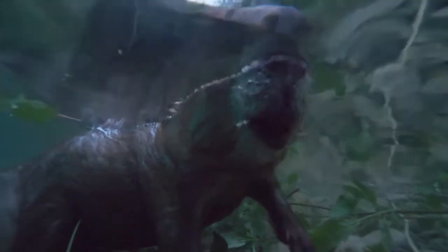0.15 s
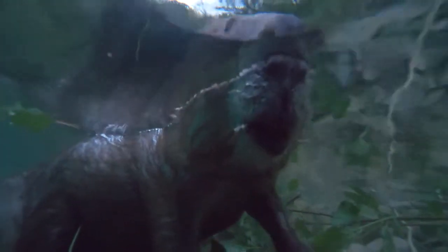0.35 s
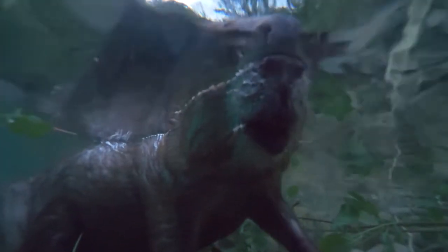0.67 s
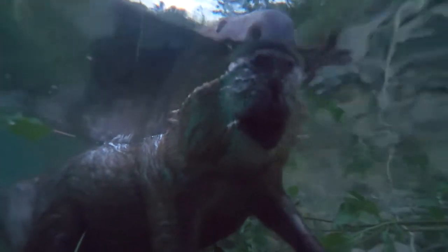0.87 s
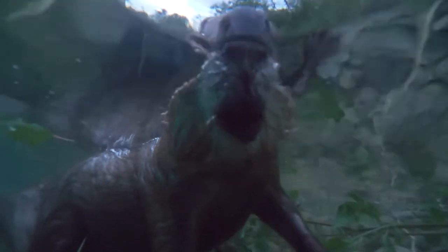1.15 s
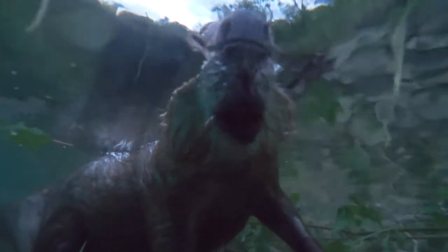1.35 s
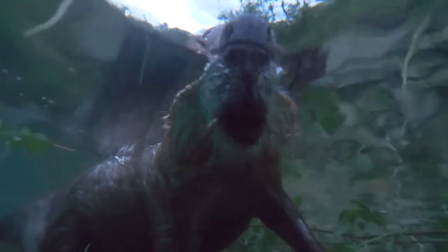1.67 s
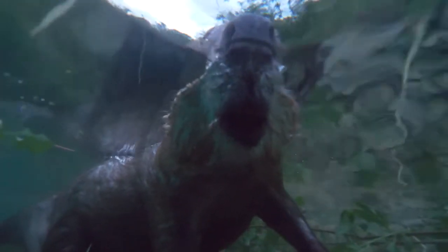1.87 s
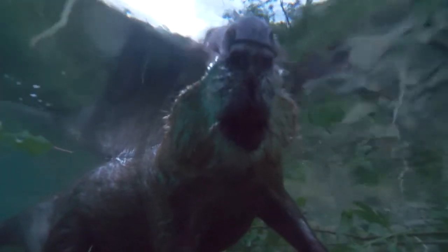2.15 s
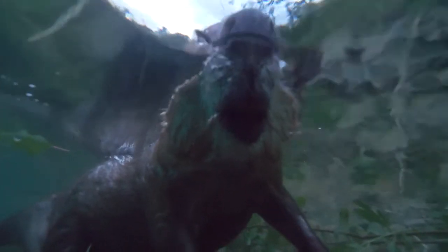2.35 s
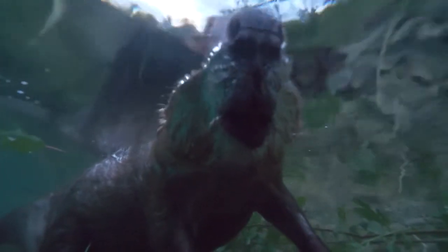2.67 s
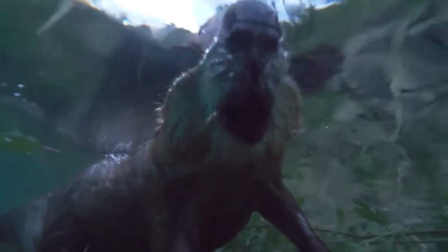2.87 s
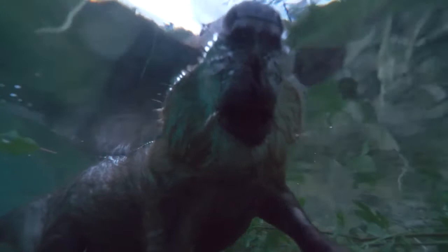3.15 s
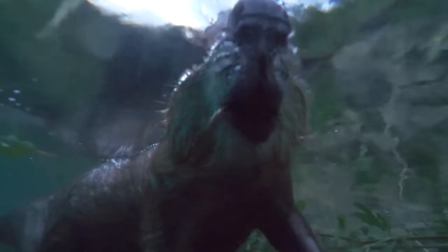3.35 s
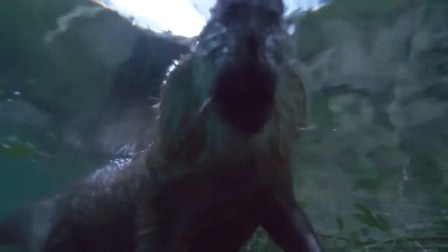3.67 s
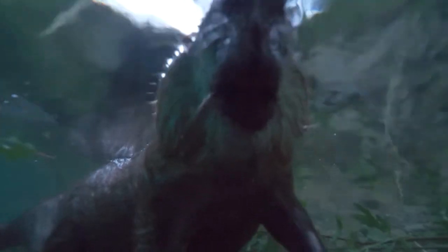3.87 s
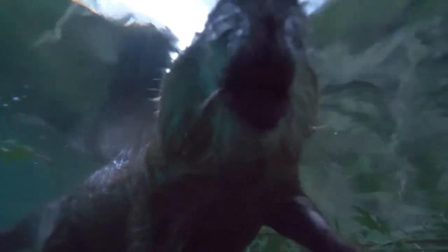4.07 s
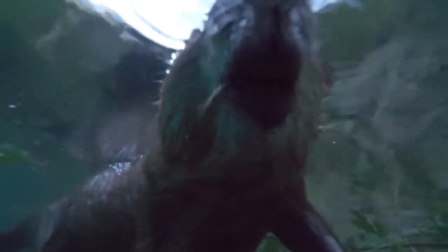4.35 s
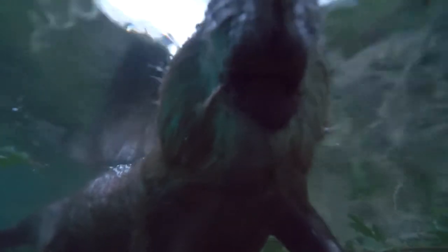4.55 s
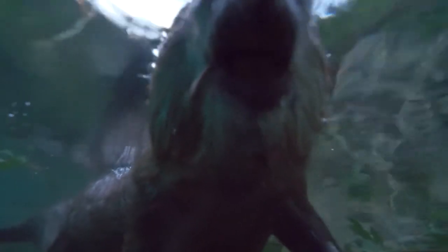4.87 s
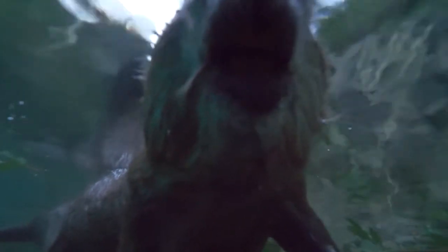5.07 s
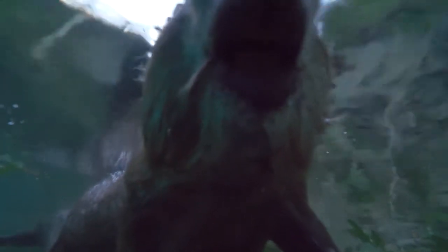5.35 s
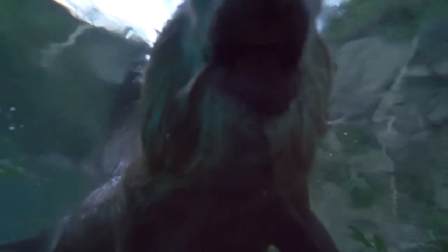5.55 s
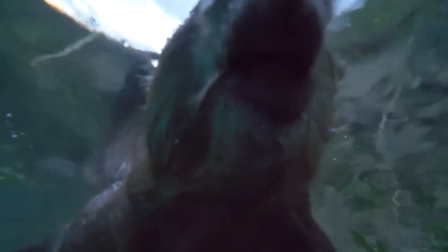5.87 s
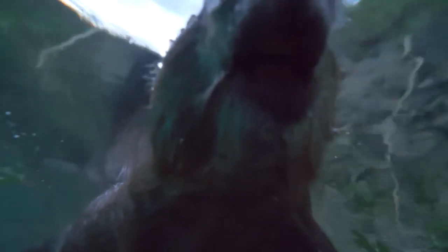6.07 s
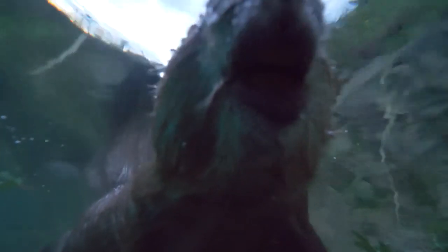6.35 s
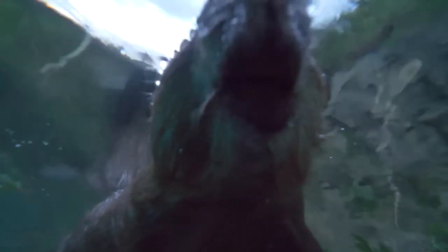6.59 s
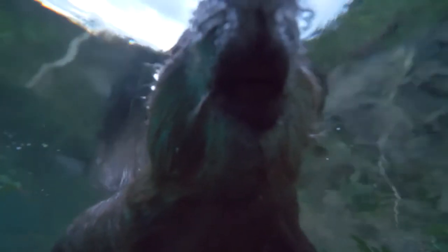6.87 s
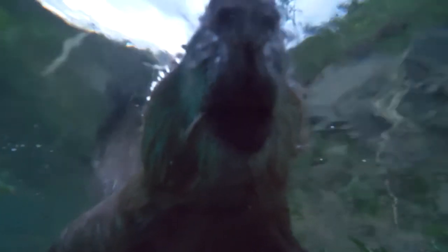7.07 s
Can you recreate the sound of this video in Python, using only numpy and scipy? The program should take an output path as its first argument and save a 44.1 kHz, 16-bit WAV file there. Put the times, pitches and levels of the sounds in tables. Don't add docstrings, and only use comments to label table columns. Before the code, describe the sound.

A microphone sealed in a camera housing underwater hears a hollow, mid-low hum of river current, swelling slightly at times, with constant preamp hiss and a faint high whine pulsing very rapidly. In the first 1.5 seconds there are only soft nudges, a dull ping at 0.6 and small, bright ticks of grit. At 1.6 a hard, hollow knock rings the box, with a rattle, scrape and weaker follow-ups to 1.9. A heavier, duller cluster of bumps and rubs comes from 2.1 to 2.5, then a light crisp knock at 3.3 and muffled bumps and crackles until about 4.1. The middle is calmer: tiny taps near 4.8 to 5.0 and a short clear ping at 5.7. The loudest knock strikes at 6.5, followed by small bumps and rubs, a final knock at 7.1 and a stronger surge of hum.

```python
import sys
import numpy as np
from scipy import signal
from scipy.fft import rfft, irfft, next_fast_len
from scipy.io import wavfile
from scipy.ndimage import uniform_filter1d, minimum_filter1d

SR = 44100
rng = np.random.default_rng(int(sys.argv[2]) if len(sys.argv) > 2 else 0)


def store_pcm(level_fs):
    pcm = np.round(np.clip(level_fs, -1, 1) * 32767).astype(np.int16)
    wavfile.write(sys.argv[1], SR, np.atleast_2d(pcm).T)


def level_to_linear(level):
    exponent = np.asarray(level, float) / 20
    return 10 ** exponent


N = 318402
BLOW_N = 8192

# f/Hz, width/Hz, level in current/dB, level when struck/dB, side re mid/dB
THUMP = [(90.6, 43, -30.5, 7, -55), (134.2, 34, -26.5, 10, -57), (151.7, 25.3, -24.5, 0.5, -49),
         (234, 106, -27, -10.5, -31)]
BOX = [(367.4, 46.3, 1, -2, -39), (403.5, 55, -1.5, 29, -24), (471, 55.4, 0, -25, -16.5),
       (560, 103, -13.5, -35, -13)]
WALL = [(763, 57.7, -4, 2, -9.5), (973, 51.7, -0.5, 2, -16.5), (1166, 47, -19.5, -18.5, -1),
        (1358, 63, -16, -11, -1), (1508, 45.6, -7.5, -4.5, -10), (1671, 87, -24.5, -15, 2)]
RIM = [(2044, 50, -22, 9, -6.5), (2349, 136, -38.5, 10, -7.5), (2700, 23, -52, -62, -6),
       (3000, 115, -43, -1, -5), (3590, 470, -40, 1, -13), (4160, 110, -36.5, -3, -1),
       (5490, 660, -36.5, -12, -20)]
PORT = [(4230, 140, 0, -21, -4), (6480, 950, 0, -9.5, -4), (7820, 380, 0, 2, -14), (9230, 990, 0, -10, -18),
        (9570, 610, 0, -4, -24), (9920, 580, 0, -0.5, -18), (11030, 620, 0, 4, -8),
        (12640, 640, 0, -1.5, -3), (15200, 1200, 0, -11, -2)]
FRAME = [(3970, 450, 0, 6.5, -8), (4990, 700, 0, 4, -5), (5580, 470, 0, 3, -8)]

# t/s, box peak level/dB, weight/dB, hardness/dB
KNOCKS = [
    (1.6195, -2.5, -3, -11),
    (1.661, -20, 3, 3),
    (1.807, -25.5, -1.5, -3),
    (2.225, -16.5, -1, -1.5),
    (3.264, -14.5, -13, -2),
    (3.643, -27.5, -16, 5),
    (6.5425, -1.5, -6.5, -7.5),
    (6.596, -37, -8, 2),
    (6.723, -31, -18, -2.5),
    (7.0945, -19.5, -16, -4.5),
]
# t/s, box peak level/dB, weight/dB, hardness/dB
NUDGES = [(0.101, -35, -11, -7), (0.353, -28.5, -20, -8), (0.562, -33, -24, -19), (0.842, -37, -6, -14),
          (1.177, -30, -34, -18), (1.36, -30, -21, -19), (2.158, -29, 2, -9), (2.194, -24, -20, -20),
          (2.353, -29, -20, -3), (2.758, -23, -35, -20), (3.09, -33, -10, -8), (3.161, -34.5, -2, 1),
          (3.426, -34, -11, -14), (3.525, -27.5, -15, -1), (3.842, -27.5, -17, -14), (4.01, -33, -23, 0),
          (4.939, -29.5, -20, -5), (5.288, -28, -26, -19), (5.544, -49, -21, -8), (6.825, -25.5, -15, -9),
          (7.024, -26.5, -9, -15), (2.064, -22, -13, -8), (2.416, -22, -4, -4), (2.454, -20, -18, -6),
          (3.447, -16, -10, -9), (3.621, -22.5, -30, -9), (6.687, -21.5, -1, -10)]
# t/s, box peak level/dB, weight/dB, hardness/dB
TAPS = [
    (0.195, -43.5, -27, 7),
    (4.832, -42, -31, -4),
    (4.99, -37.5, -31, 12.5),
    (4.996, -36, -28, 12),
    (5.657, -36, -31, -3),
    (5.76, -41, -12, 4.5),
]
# t/s, length/s, box level/dB, weight/dB, hardness/dB
RUBS = [(1.625, .02, -29, 7, -12), (1.653, 0.035, -28.5, -9, -3), (1.717, 0.049, -44, -5, -12),
        (1.828, 0.037, -37.5, 0.5, -4.5), (1.877, 0.075, -46, -5, -14), (2.212, 0.02, -24.5, -18, -13),
        (2.232, 0.017, -29.5, 6, -20), (2.29, 0.03, -39.5, 0, -15), (2.328, 0.15, -34, -4, -8),
        (2.498, 0.027, -45, 1, 4), (3.073, 0.033, -36.5, -8, -17), (3.135, 0.033, -50, -7, -9),
        (3.426, 0.039, -33, -15, -7), (3.531, 0.036, -30, -9, -10.5), (3.605, 0.064, -31.5, -11, -10),
        (3.82, 0.022, -36.5, -13, -8.5), (4.002, 0.042, -33.5, -8.5, -13), (4.128, 0.14, -40, -28, -10),
        (6.575, 0.033, -32.5, -3, -9), (6.713, 0.023, -36, -6, -6.5), (6.88, .04, -33.5, -11, -10),
        (6.998, 0.008, -41.5, -19, -4), (7.09, 0.059, -35, -1.5, -5.5)]
# t/s, peak level/dB, left re right/dB
GRIT = [(0.104, -41.5, -0.5), (0.194, -43, -6), (0.346, -36, -1), (0.3591, -31.5, 0.0), (0.547, -33, 0),
        (0.8214, -43, -5), (0.8315, -27, 0.5), (0.997, -39.5, 1.0), (1.1776, -30.5, 1.0),
        (1.3598, -42, 0.0), (1.592, -33.5, 1.0), (1.7828, -39, 2.0), (1.832, -45, 1.0),
        (2.0607, -36.5, 0.0), (2.253, -38, 1.0), (2.4683, -30.5, 0.5), (2.7576, -45, 3),
        (2.9252, -30, -0.5), (3.086, -38.5, 0.0), (3.3074, -40, -1.5), (3.319, -31, -1.0),
        (3.626, -33, 0.0), (3.8162, -39, 0.0), (4.0233, -33, 0.0), (6.8269, -45, -1), (6.587, -46, 0.0),
        (6.689, -47, 0.0), (6.731, -45, 0.0)]
# t/s, peak level/dB, frame re peak/dB, length/s
RATTLES = [(1.6195, -31, -13, .003), (1.625, -29.5, -1, 0.0027), (1.654, -40, -12, 0.0026),
           (1.658, -37, -7, 0.0044), (1.6794, -47, -12, .003), (1.807, -34.5, -8, 0.0022),
           (2.2258, -42, -18, .002), (2.357, -44, -17, .002), (3.266, -24, -13, .0013),
           (3.642, -34.5, -9, 0.0037), (4.9965, -36.5, -19, 0.0012), (6.544, -25.5, 0, 0.0018),
           (7.093, -40, -8, .002), (7.136, -41, -4, .0012)]
# t/s, peak level/dB, f/Hz, t60/s
PINGS = [(0.195, -35, 3350, 0.025), (.5625, -23.5, 373, 0.13), (5.76, -46, 2520, 0.027),
         (1.619, -10, 972, 0.081), (2.421, -38, 1444, 0.085), (3.6217, -22, 428, 0.043),
         (3.449, -24, 740, 0.091), (3.541, -26, 717, 0.061), (3.648, -25, 690, 0.047),
         (4.828, -32, 1503, 0.078), (4.993, -50, 4160, 0.048), (4.996, -33, 4160, 0.031),
         (5.6581, -15, 1492, 0.057), (5.658, -42, 2330, 0.027), (6.545, -13, 965, 0.055),
         (6.5974, -22, 1000, 0.034)]
# t/s, surge/dB
SURGE = [(0.0, 5), (0.2, 1.5), (0.9, 2.5), (2.15, 5.5), (2.8, 1), (3.6, 4), (4.4, -1), (5.9, -1),
         (6.45, -0.5), (6.95, 7), (7.22, 5)]
# f/Hz, level/dB
HISS = [(2470, -6.5), (2860, -7), (5690, -10.5), (10300, -9), (10600, -13), (11500, -12.5), (15700, -19)]


def bumps(out):
    for rows, contact_s, rim_db, sharpness, damp in ((KNOCKS, 0.0041, -13, 1.4, 1.165),
                                                     (NUDGES, 0.0064, -18.5, 0.47, 1.26),
                                                     (TAPS, 0.003, -2, 0.33, 1.6)):
        for t_s, box_db, weight_db, hard_db in rows:
            snaps = (5.1, 9.0, 21, 1.0)
            for (modes, db), snap in zip(families(weight_db, hard_db, rim_db), snaps):
                add_blow(out, t_s, modes, box_db + db, contact_s, sharpness * snap, damp=damp)


def rubs(t, size):
    rise_db_per_s, fall_db_per_s, rim_db = 1200, 800, -17.5
    port_db = -22.5
    start, length, box_db, weight_db, hard_db = np.transpose(RUBS)[:, :, None]
    coarse_t = t[::44]
    early_s = np.maximum(start - coarse_t, 0)
    late_s = np.maximum(coarse_t - start - length, 0)
    press_db = box_db - rise_db_per_s * early_s - fall_db_per_s * late_s
    slips = level_to_linear(3.0 * walk(110)) * level_to_linear(2.4 * rng.exponential(size=N))
    out = 0
    for modes, db in [*families(weight_db, hard_db, rim_db), (PORT, port_db + hard_db)]:
        push = np.interp(t, coarse_t, level_to_linear(press_db + db).sum(axis=0))
        spread = 0.4 if modes is BOX or modes is WALL else 0
        transfer = blow_response(modes, size, coupling=2.16, spread=spread)
        out = out + push * ring(slips * pair(N), transfer)
    return out


def port_ticks(out):
    ticks = [(t_s, db, 0.0026, pan_db, -13) for t_s, db, pan_db in GRIT]
    ticks += [(t_s, db, length_s, 0.4, frame_db) for t_s, db, frame_db, length_s in RATTLES]
    for t_s, peak_db, contact_s, pan_db, frame_db in ticks:
        add_blow(out, t_s, PORT, peak_db, contact_s, 1.0, pan_db)
        add_blow(out, t_s, FRAME, peak_db + frame_db, contact_s, 2.5, pan_db)


def pings(out):
    age_s = np.arange(BLOW_N) / SR
    for t_s, peak_db, hz, t60_s in PINGS:
        envelope = (1 - np.exp(-age_s / 0.00046)) * np.exp(-np.log(1000) * age_s / t60_s)
        ping = level_to_linear(peak_db) * envelope * np.sin(2 * np.pi * hz * age_s)
        i = int(t_s * SR)
        out[:, i:i + BLOW_N] += ping * np.array([[1], [.1]])


def current(t, size):
    hum_db, hum_per_surge, lump_db = -39, 0.042, -59.5
    surge_db = np.interp(t, *np.transpose(SURGE))
    hum = ring(level_to_linear(0.48 * walk(11.0)) * pair(N), flow_response(BOX + WALL + RIM, size))
    lumps = ring(level_to_linear(3.9 * walk(21)) * pair(N), flow_response(THUMP, size))
    return level_to_linear(hum_db + hum_per_surge * surge_db) * hum + level_to_linear(lump_db + surge_db) * lumps


def hiss(size):
    level_db, side_db, null_hz = -58, -2.5, 9300
    f = np.arange(size // 2 + 1) * SR / size
    hz, db = np.transpose(HISS)
    colour = level_to_linear(np.interp(np.log(np.clip(f, 2600, None)), np.log(hz), db)) * f / (f + 300)
    comb = level_to_linear(side_db) * np.sin(np.pi * f / null_hz) * level_to_linear(1.33 * f / null_hz)
    return level_to_linear(level_db) * ring(rng.standard_normal((2, N)), np.array([colour, colour * comb]))


def whine_and_clock(t):
    cycle_hz, start_cycles, on_share = 50, .9, .52
    whine_hz, spread_hz, whine_db = 10865, 20.5, -57.5
    clock_hz, clock_peak_s, clock_db = 15525, .005, -70
    turn = t * cycle_hz - start_cycles + 1
    pitch_hz = whine_hz + spread_hz * rng.standard_normal(int(turn[-1]) + 1)[turn.astype(int)]
    gate = uniform_filter1d(1. * (turn % 1 < on_share), size=40)
    whine = level_to_linear(whine_db) * gate * np.sin(2 * np.pi * np.cumsum(pitch_hz) / SR)
    beat = np.cos(np.pi * cycle_hz * (t - clock_peak_s))
    clock = level_to_linear(clock_db) * beat * np.sin(2 * np.pi * clock_hz * t)
    return whine * np.array([[1], [.07]]) + clock * np.array([[1], [.25]])


def add_blow(out, t_s, modes, peak_db, contact_s, snap, pan_db=0., damp=1.):
    age = np.arange(BLOW_N) / SR / contact_s
    drive = (1 - np.exp(-age / 0.24)) * np.exp(-age) * pair(BLOW_N)
    drive[:, 0] = -snap * np.sqrt(contact_s / 0.0027)
    blow = ring(drive, blow_response(modes, BLOW_N, scatter_db=3.0, damp=damp))
    blow = blow * level_to_linear(peak_db) / np.abs(blow[0]).max()
    i = int(t_s * SR)
    n = min(BLOW_N, N - i)
    out[0, i:i + n] += blow[0, :n]
    out[1, i:i + n] += blow[1, :n] + np.tanh(pan_db / 17.4) * blow[0, :n]


def families(weight_db, hard_db, rim_db):
    return zip((BOX, THUMP, WALL, RIM), (0, weight_db, hard_db, rim_db + 0.83 * hard_db))


def blow_response(modes, size, scatter_db=0., coupling=1.9, damp=1., spread=0.):
    f = np.arange(size // 2 + 1) * SR / size
    out = np.zeros((2, len(f)), complex)
    for k, (hz, width, flow_db, blow_db, side_db) in enumerate(modes):
        width = width * damp
        mode_db = blow_db + spread * (flow_db - blow_db)
        gain = level_to_linear(mode_db + scatter_db * rng.standard_normal())
        mode = resonance(f, hz, width) * resonance(f, hz, coupling * width)
        out += gain * mode * mid_side(k, side_db)
    above = 1j * f / (1.9 * modes[-1][0])
    return out / (1 + 1.57 * above + above ** 2)


def flow_response(modes, size):
    f = np.arange(size // 2 + 1) * SR / size
    out = np.zeros((2, len(f)), complex)
    for k, (hz, width, flow_db, _, side_db) in enumerate(modes):
        out += (-1) ** k * level_to_linear(flow_db) * resonance(f, hz, 1.57 * width) ** 2 * mid_side(k, side_db)
    return out


def mid_side(k, side_db):
    return np.array([[1], [(-1) ** k * 1j * level_to_linear(side_db)]])


def resonance(f, hz, width):
    return 1 / (1 + 1j * (f ** 2 - hz ** 2) / (np.maximum(f, 1) * width))


def ring(drive, transfer):
    size = 2 * transfer.shape[1] - 2
    out = irfft(rfft(drive, size) * transfer, size)[:, :drive.shape[1]]
    return out / np.sqrt(np.mean(out[0] ** 2))


def pair(size):
    shared = 0.97
    one, other = rng.standard_normal((2, size))
    return np.array([one, shared * one + np.sqrt(1 - shared ** 2) * other])


def walk(rate_hz):
    k = int(SR / rate_hz)
    steps = np.repeat(rng.standard_normal(N // k + 1), k)
    slewed = uniform_filter1d(uniform_filter1d(steps, k), k)[:N]
    return slewed / np.sqrt(np.mean(slewed ** 2))


def scene():
    t = np.arange(N) / SR
    size = 2 * next_fast_len(N // 2 + BLOW_N)
    blows = np.zeros((2, N))
    bumps(blows)
    port_ticks(blows)
    pings(blows)
    mid, side = blows + rubs(t, size) + current(t, size) + hiss(size) + whine_and_clock(t)
    side = side + 0.01 * mid
    return np.array([mid + side, mid - side])


def top_cut(x):
    return signal.sosfilt(signal.butter(12, 16500, fs=SR, output="sos"), x)


def record(dry):
    low_hz, top_hz = 73, 15740
    limit_db, limit_slope, hold_s = -18, 0.24, 0.014
    heard = signal.sosfilt(signal.butter(3, low_hz, "high", fs=SR, output="sos"), dry)
    hold = int(hold_s * SR)
    peak = -minimum_filter1d(-np.abs(heard).max(axis=0), hold, origin=(hold - 1) // 2)
    late = uniform_filter1d(peak, size=201, origin=100)
    heard = heard * np.minimum(level_to_linear(limit_db) / (late + 1e-9), 1) ** limit_slope
    rounded = np.tanh(.5 * heard) / .5
    cut = signal.sosfilt(signal.ellip(10, .2, 50, top_hz, fs=SR, output="sos"), rounded)
    return top_cut(cut)


dry = scene()
out = record(dry)
store_pcm(out)
```